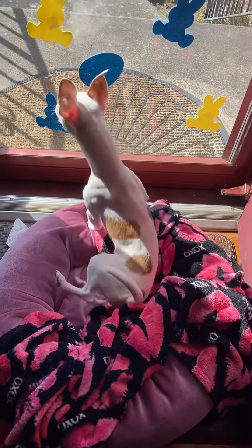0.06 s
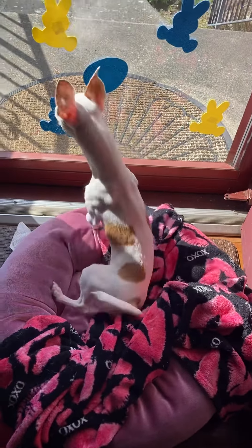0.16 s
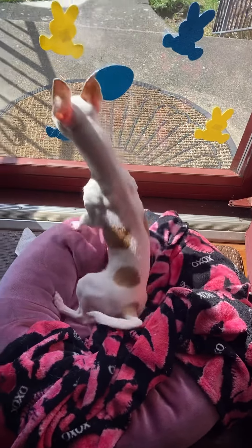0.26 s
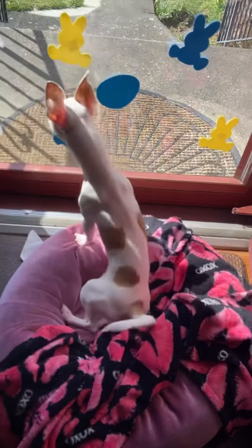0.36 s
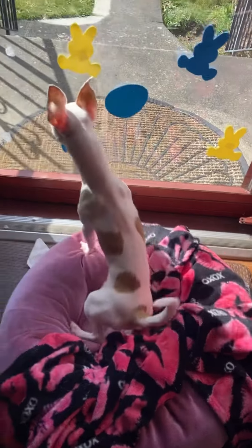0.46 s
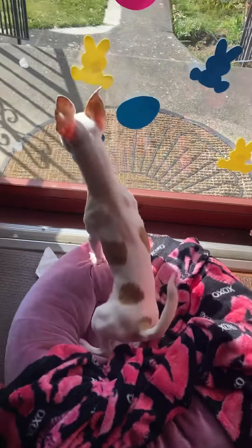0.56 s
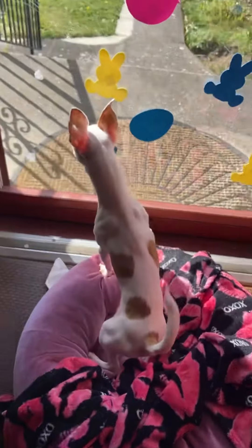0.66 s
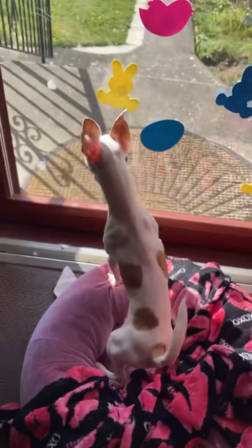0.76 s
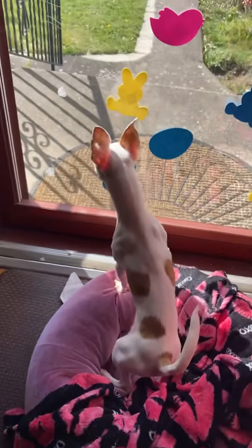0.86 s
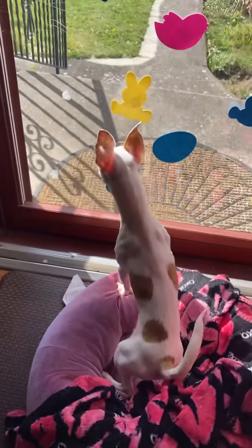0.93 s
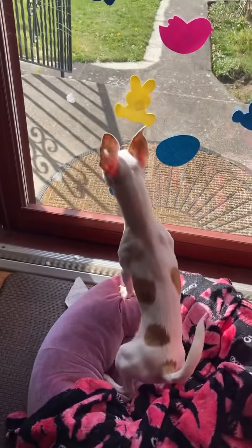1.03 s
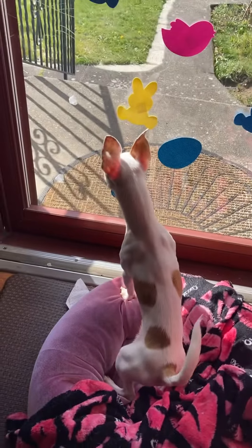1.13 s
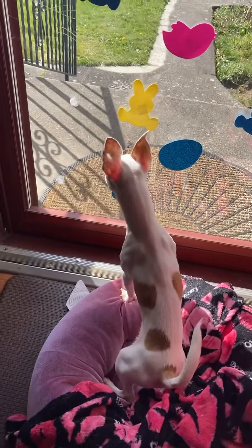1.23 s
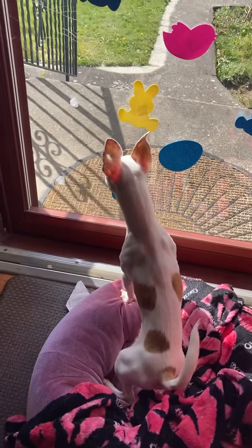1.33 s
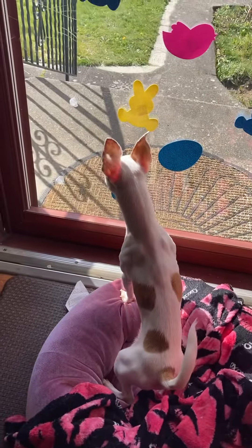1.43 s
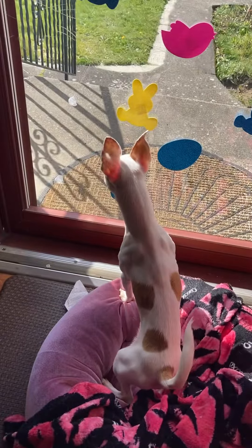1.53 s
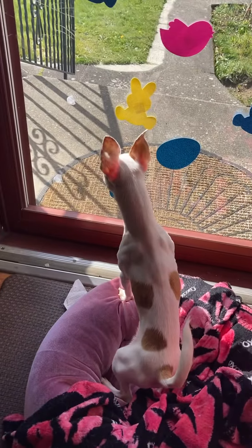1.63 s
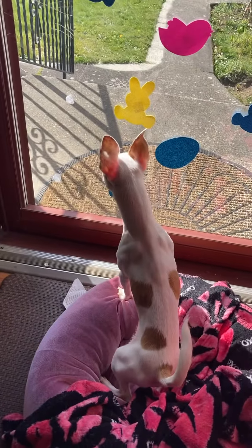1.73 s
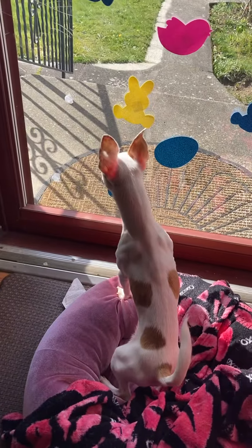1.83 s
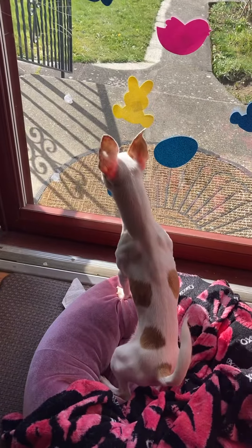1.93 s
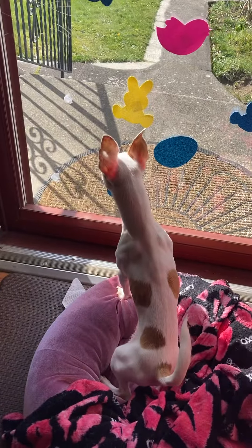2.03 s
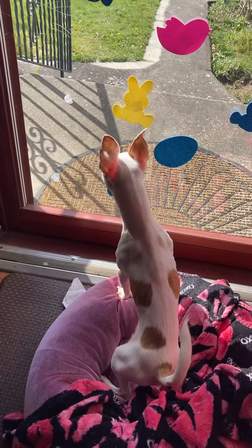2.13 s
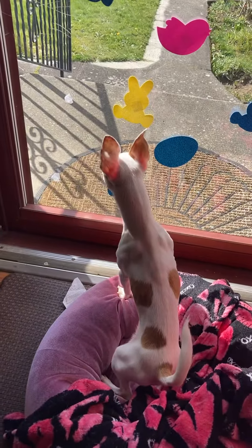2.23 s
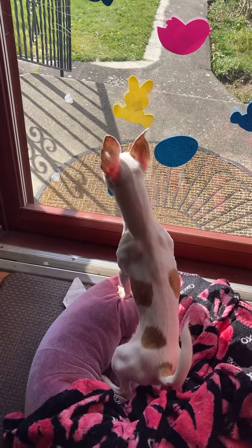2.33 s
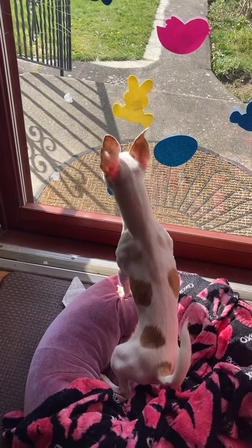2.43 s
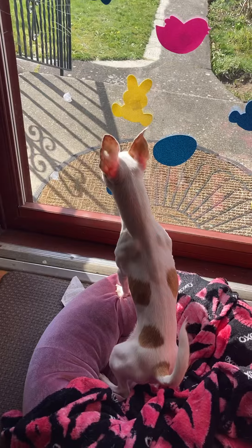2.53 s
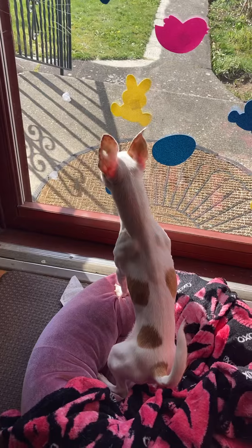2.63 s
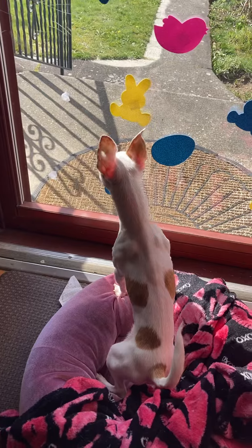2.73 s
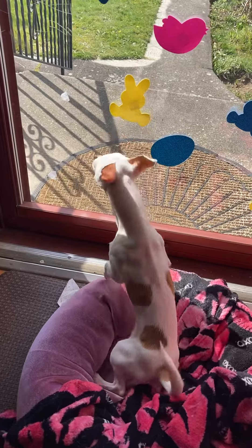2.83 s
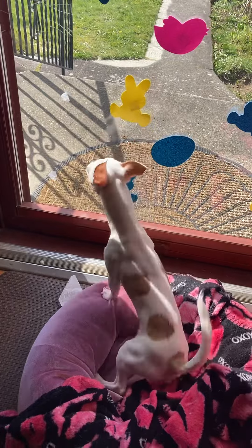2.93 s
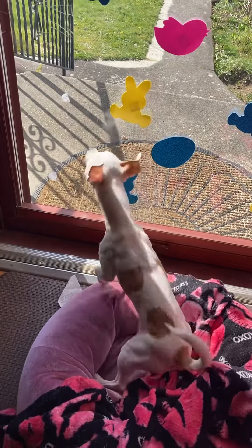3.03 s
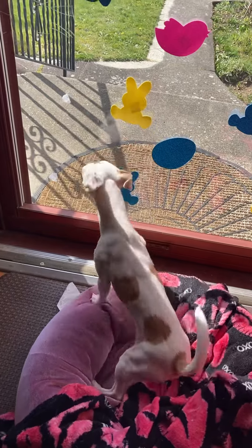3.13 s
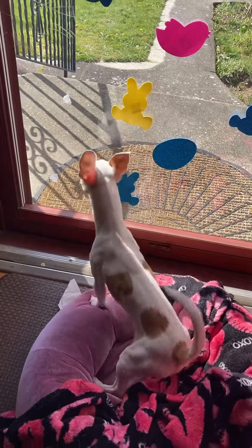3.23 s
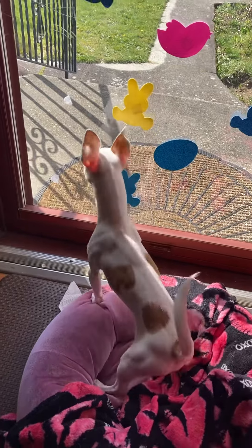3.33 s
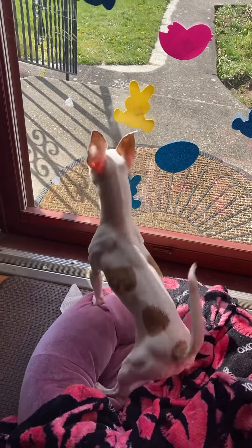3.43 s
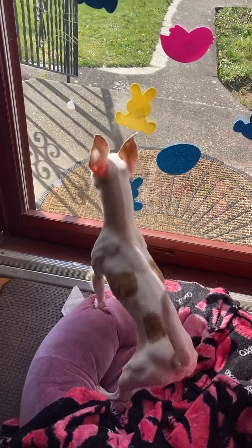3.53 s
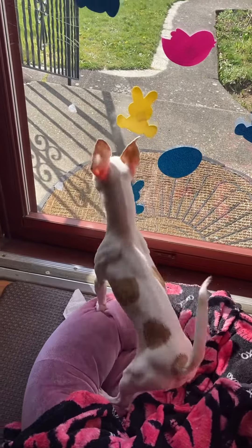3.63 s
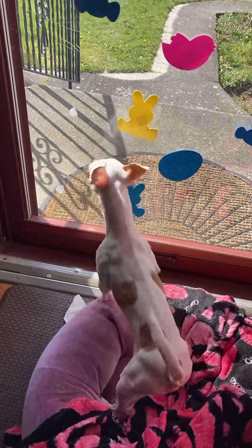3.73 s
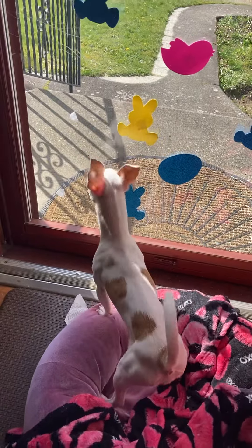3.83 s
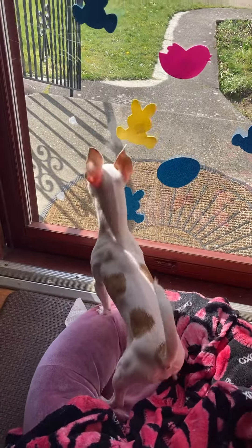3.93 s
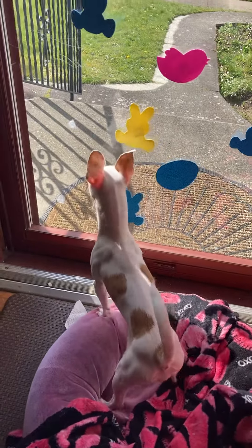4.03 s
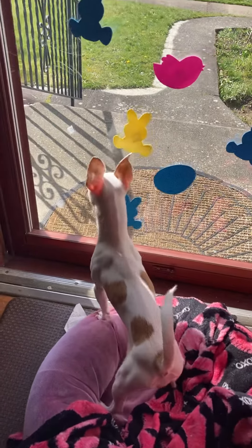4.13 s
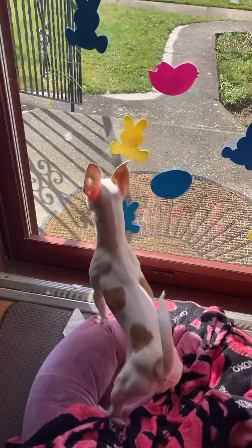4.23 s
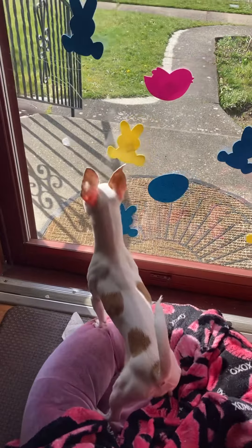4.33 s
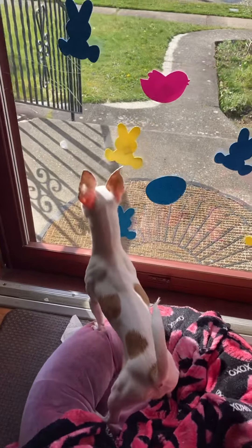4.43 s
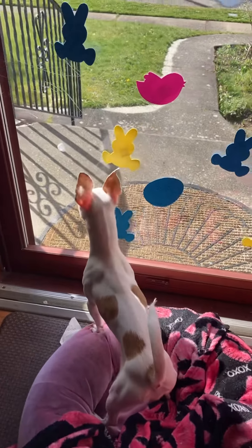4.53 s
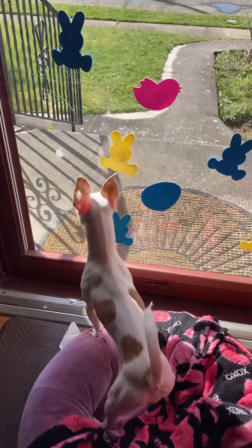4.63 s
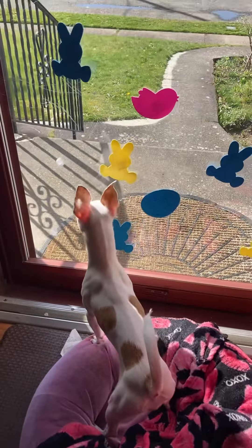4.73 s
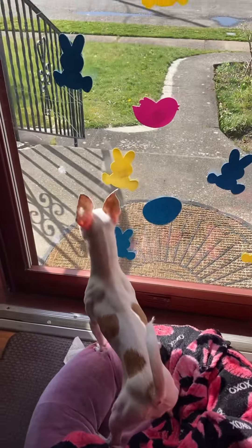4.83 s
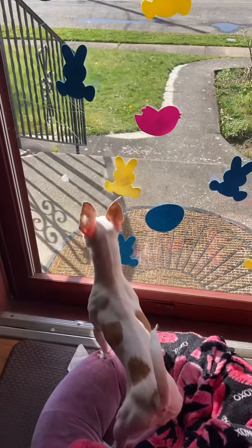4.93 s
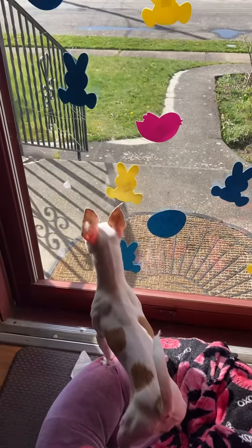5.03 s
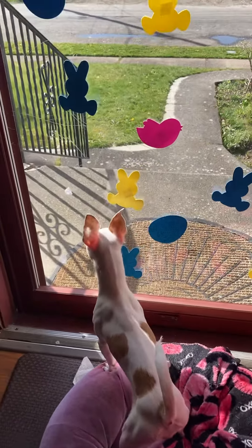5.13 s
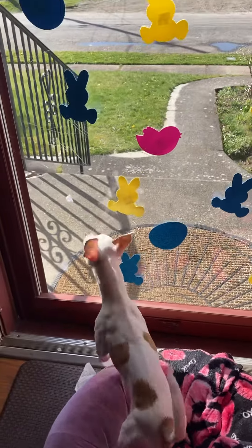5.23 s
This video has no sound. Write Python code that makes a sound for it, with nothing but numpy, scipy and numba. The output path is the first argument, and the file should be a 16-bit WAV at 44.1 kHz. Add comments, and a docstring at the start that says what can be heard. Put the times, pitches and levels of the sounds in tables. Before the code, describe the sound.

Indoors, close up: a fading throaty growl from a small dog, quiet hum, a quick double bark, another bark, and a last upward-breaking yap.

```python
"""A quiet room with a glass door: a small dog growls, sniffs, gives a double bark and two single barks.
The voice is rough vocal folds through jaw, tongue and chest resonances; breaths and lips are shaped noise.
A fridge-like hum throbs over rumble and air noise; all three sink just after every bark begins.
A phone hears it close by: its two ports, mixed to mid and side, cut notches into the treble."""
import sys
import numpy as np
from scipy import signal
from scipy.fft import rfft, irfft, next_fast_len
from scipy.io import wavfile
from scipy.ndimage import uniform_filter1d, minimum_filter1d, map_coordinates
from numba import njit

SR = 44100
rng = np.random.default_rng(int(sys.argv[2]) if len(sys.argv) > 2 else 0)


def to_wav(sig):
    """Store sig (one row per channel, or 1-D mono) as 16-bit WAV at the path in sys.argv[1].

    Samples outside -1..1 are clipped; the rate is SR.
    """
    pcm = np.clip(np.atleast_2d(sig), -1, 1) * 32767
    pcm = np.round(pcm).astype(np.int16)
    wavfile.write(sys.argv[1], SR, pcm.T)  # frames by channels


N = 233067

# barks: start_s, tongue_hz (jaw half open), chest_db (before the opening swell),
# upper_db and rasp_db (before they brighten with the jaw), roughness (0-1)
BARKS = [(2.72, 1883, -14.5, -8, -23.5, 0.83), (2.96, 1841, -21.5, -18.5, -31.5, .48),
         (3.612, 1810, -18.5, -18, -29.5, .65), (5.146, 1452, -23, -24.5, -31, 0.53)]
# how each bark is pushed out, one list a bark: time_s, level_db, jaw_opening (0-1)
BARK_EFFORT = [
    [(2.72, -58, 0.01), (2.735, -27.5, 0.16), (2.747, -23, 0.11), (2.753, -4.5, 0.05), (2.815, -19, 0.94),
     (2.85, -24.5, 0.5), (2.89, -38, .3)],
    [(2.96, -37.5, .2), (2.975, -21, .3), (3.005, -13.5, .6), (3.035, -12.5, 1), (3.055, -15, .9),
     (3.079, -11.5, .35), (3.095, -34, .05)],
    [(3.612, -53, 0.01), (3.65, -18, 0.17), (3.664, -16, .35), (3.672, -11, 0.47), (3.72, -13.5, 0.91),
     (3.748, -16, .6), (3.775, -43.5, 0.53)],
    [(5.146, -48, .65), (5.152, -43.5, .65), (5.177, -26.5, 0.49), (5.188, -10, .6), (5.24, -12.5, .85),
     (5.246, -22.5, .8), (5.28, -20, .8)],
]
# moments where the bark's level dips briefly, in its lowest mouth resonance: time_s, depth_db
LEVEL_DIPS = [(2.772, 12), (2.822, 12), (3.038, 20), (3.067, 16), (3.664, 10), (3.697, 12), (3.722, 10),
              (5.203, 18), (5.213, 18)]
# upper resonances of the open mouth: centre_hz, width_hz, level_db
MOUTH_MODES = [(1222, 220, -1), (1900, 400, -4.5), (2660, 130, -3.5), (3300, 560, -21), (4440, 660, -13)]
# chest resonance, sounds as the mouth opens: centre_hz, width_hz, level_db
CHEST_MODES = [(250, 210, 0)]
# airy hiss of the voice: centre_hz, width_hz, level_db
RASP_MODES = [(6490, 2400, -13.5), (8725, 500, 6.5), (9400, 970, -1.5), (14220, 2000, 2)]
# growls through closed jaws: start_s, end_s, first_pitch_hz, settled_pitch_hz, first_level_db,
# fade_db_per_s, throat_db, first_flutter_depth (0-1), first_rasp_db
GROWLS = [(0, .85, 244.4, 190, -30.5, 16.5, 2, 0.1, -24), (3.86, 4.1, 275, 261.9, -50.5, 29, -10, .15, -32)]
# flapping of the throat: time_s, flaps_per_s
THROAT_FLUTTER = [(0, 28.3), (.3, 27.9), (.45, 24.3), (.85, 23)]
# resonances behind closed jaws: centre_hz, width_hz, level_db
JAW_MODES = [(394.6, 93, -6), (528.3, 43, 4), (746, 116, -7), (956, 180, -9), (1163.6, 120, -15.5),
             (1518, 35, -13)]
# low resonances of the throat: centre_hz, width_hz, level_db
THROAT_MODES = [(226.4, 96, 0), (158.7, 50, -5)]
# breaths: start_s, rise_s, hold_s, level_db, fall_db_per_s, whistle_db (against the breath)
SNIFFS = [(1.324, 0.0087, 0.038, -75, 250, 14), (1.42, 0.039, 0.1, -70.5, 116, -7),
          (3.143, 0.046, 0.11, -47, 140, -32)]
# spectrum of nose air: frequency_hz, relative_density_db
NOSE_SPECTRUM = [(300, -30), (900, 13.5), (2000, -2), (3400, -9.5), (4800, -14.5), (7500, -17),
                 (9500, -24.5), (15000, -30)]
# nose whistle tones, each with its octave: frequency_hz, relative_level_db
WHISTLE_TONES = [(1950, 0), (2400, -10)]
# lips parting: start_s, level_db (rms starts 4.5 dB lower), top_hz, t60_s
LIP_SMACKS = [(3.593, -37, 1127, 0.038), (4.309, -50.5, 11320, 0.034)]
# decay of the room tail: frequency_hz, t60_s
ROOM_DECAY = [(200, 0.95), (1000, 0.44), (3000, 0.62), (9000, 0.14)]
# echo off the door, heard by the side: frequency_hz, level_db
GLASS_ECHO = [(200, -30), (600, -19), (1500, -10), (2100, -13), (3200, -4), (4500, -18.5)]
# dog's sound pushed to the right: frequency_hz, share
RIGHT_LEAN = [(150, .05), (400, .25), (700, .75), (1100, .45), (1400, .2), (1750, .05), (2100, .3),
              (4000, 0)]
# pitch of the hum: time_s, pitch_hz
HUM_PITCH = [(0, 74), (2.7, 73.9), (3.4, 68.64), (5.28, 69.22)]
# spectrum of the rumble: frequency_hz, relative_density_db
RUMBLE_SPECTRUM = [(21, -42.5), (35, -15), (75, 2), (108, -12.5), (145, -19), (237, -20.5), (500, -35),
                   (650, -65.5), (1100, -120)]
# spectrum of the air noise: frequency_hz, relative_density_db
AIR_SPECTRUM = [(180, -37), (300, -25.5), (614, -2), (900, -9), (1010, -8), (5200, -21), (6760, -56.5),
                (11400, -120)]
# how the background sinks, rows hum, rumble, air: recovering_dip_db, lasting_loss_db (a bark)
BACKGROUND_SINK = [(24, 2.5), (7, 4.5), (13.5, 4.5)]
# tone of the summed ports: frequency_hz, gain_db
MID_TONE = [(4000, 1), (5000, 2), (5600, -25), (6200, 0), (8000, -3), (10600, -2.5), (11300, -41),
            (12400, -50), (13200, -17.5), (15000, -18.5)]
# tone of the surroundings at the side: frequency_hz, gain_db
SIDE_TONE = [(60, -26.5), (200, -22), (350, -6.5), (600, 6), (1500, 0.5), (3000, 2.5), (5500, 2),
             (7000, -0.5), (8500, -28.5), (10500, -10.5), (13000, -15), (15000, -40)]
# port spacing, mid fed to the side a quarter turn ahead: frequency_hz, share (signed)
PORT_SPACING = [(1000, 0.091), (3000, -0.53), (4500, 0.77), (5500, 0.564), (5700, -0.68), (7000, -.8),
                (8000, 0.16), (9200, 0), (10200, .5), (12000, .3), (13500, 0.33)]

# bark voice
SHUT_HZ, OPEN_HZ = 270, 368  # pitch with the jaw shut and wide open, before the break
MOUTH_SHUT_HZ, MOUTH_OPEN_HZ = 810, 1120  # lowest mouth resonance
BRIGHTEN_DB, RASP_GAIN_DB, BRIGHT_LAG_S = 12, 1.5, 0.0052  # upper resonances and rasp grow with the jaw
BREAK_S, BREAK_PITCH_RATIO, BREAK_UPPER_DB = 5.243, 1.45, 8  # the last bark breaks upward
DIP_S = .0045
MOUTH_TOP_HZ, OVER_TOP_DB = 3150, -15.5  # the voice drops steeply above the mouth's range
TONGUE_DB, TONGUE_BREAK_DB = 1, 4  # tongue among the upper resonances; extra after the break
TONGUE_LIFT = .12  # share by which the tongue resonance rises as the jaw opens
# growls
FIRST_FLAP_S, SETTLE_S = .035, .35
GROWL_RISE_S, GROWL_STOP_DB_S = 0.05, 502
DEEPEN_PER_S, CLEAR_PER_S, GROWL_ROUGH, RASP_FADE_DB_S = 1.09, .4, .85, 10.5
# breath, echo
SNIFF_RISE_DB = 20
EARLIER_DB, EARLIER_T60_S = -43.5, 0.58  # echo of an earlier bark, level at 0 s
GLASS_LAG_S = .0017
# background
HUM_DB, HUM_FADE_DB_S, RUMBLE_DB, AIR_DB = -41.5, 3, -55.5, -73
THROB_S, FIRST_DIP_S, THROB_DEPTH = .305, .365, .8
SINK_AFTER_S, RECOVER_S = 0.043, .3  # lag after a bark starts, then time constant of recovery
DRONE_HZ, DRONE_WIDTH_HZ, DRONE_DB = 240, 25, 6.7  # faint drone in the rumble
# phone
TOP_HZ, LIMIT = 15850, .93


def amp(db):
    """Decibels to amplitude."""
    return 10 ** (np.asarray(db) / 20)


def unit(x):
    """x at an rms of 1."""
    return x / np.sqrt(np.mean(x ** 2) + 1e-20)


def along(points, hz):
    """(Hz, value) points read on a log frequency axis."""
    f, v = np.transpose(points)
    return np.interp(np.log(hz + 1), np.log(f + 1), v)


def curves(calls):
    """One value per sample for each column, and a gate that is open during the calls."""
    t = np.arange(N) / SR
    s, *cols = np.transpose(np.vstack(calls))
    gate = sum((t >= c[0][0]) & (t <= c[-1][0] + .005) for c in calls)
    smooth_gate = uniform_filter1d(np.minimum(gate, 1.), size=200)
    return [np.interp(t, s, c) for c in cols] + [smooth_gate]


def wobble(rate):
    """A smooth random curve, rate knots a second."""
    knots = rng.standard_normal(int(N * rate / SR) + 4)
    return map_coordinates(knots, [np.arange(N) * rate / SR])


def filtered(x, response):
    """x times a complex response of frequency."""
    m = next_fast_len(N + SR)
    return irfft(rfft(x, m) * response(np.fft.rfftfreq(m, 1 / SR)), m)[..., :N]


def above(f, edge_hz):
    """Gain that passes what lies above an edge."""
    return (f / edge_hz) ** 4 / (1 + (f / edge_hz) ** 4)


def below(f, edge_hz, order):
    """Gain that passes what lies below an edge."""
    return 1 / (1 + (f / edge_hz) ** order)


def modes(table):
    """Causal response of resonances (Hz, width Hz, dB), alternating in sign."""
    def response(f):
        total = 0
        for k, (c, w, db) in enumerate(table):
            total = total + (-1) ** k * amp(db) * 1j * f * w / (c * c - f * f + 1j * f * w)
        return total
    return response


def noise(response):
    """White noise coloured by a response, at an rms of 1."""
    return unit(filtered(rng.standard_normal(N), response))


def steady(x, span):
    """x with its running rms over span seconds brought to 1."""
    return x / np.sqrt(np.abs(uniform_filter1d(x * x, size=int(span * SR))) + 1e-12)


@njit
def ring(x, hz, pole):
    """A resonance whose centre moves; hz is given in radians a sample."""
    y = np.zeros(len(x))
    for i in range(2, len(x)):
        y[i] = x[i] - x[i - 2] + 2 * pole * np.cos(hz[i]) * y[i - 1] - pole * pole * y[i - 2]
    return y


def resonate(x, hz, width_hz):
    """x through a moving resonance of a given width."""
    return ring(x, 2 * np.pi * hz / SR, np.exp(-np.pi * width_hz / SR))


def folds(hz, rough, jitter, scatter_db):
    """Vocal folds: overtones that wander in phase and size, mixed with air noise that swells once a cycle."""
    rough = np.clip(rough, 0, 1)
    phase = 2 * np.pi * np.cumsum(hz * (1 + jitter * rough * wobble(90))) / SR
    voiced = np.zeros(N)
    for k in range(1, 14):
        drift = wobble(70)
        wander = (1 + .4 * k) * rough + .012 * k * k
        size = amp(scatter_db * rough * drift)
        voiced += size * np.cos(k * phase + wander * np.roll(drift, SR // 3))
    cycle = (1 + np.cos(phase)) / 2
    air = filtered((.5 + cycle) * rng.standard_normal(N), lambda f: f < 5200)
    return np.sqrt(1 - rough ** 2) * unit(voiced) + rough * unit(air), cycle


def barks():
    """A rough voice through moving mouth and tongue resonances, fixed upper ones, a chest and a treble rasp."""
    db, jaw, gate = curves(BARK_EFFORT)
    t = np.arange(N) / SR
    bark = np.maximum(np.searchsorted(np.transpose(BARKS)[0], t + .01) - 1, 0)
    _, tongue_hz, chest_db, upper_db, rasp_db, rough = np.array(BARKS)[bark].T
    broken = np.clip((t - BREAK_S) / .008 + .5, 0, 1)
    hz = (SHUT_HZ + (OPEN_HZ - SHUT_HZ) * jaw) * BREAK_PITCH_RATIO ** broken
    mouth_hz = MOUTH_SHUT_HZ + (MOUTH_OPEN_HZ - MOUTH_SHUT_HZ) * jaw
    tongue_hz = tongue_hz * (1 + TONGUE_LIFT * (jaw - .5))
    late_jaw = np.interp(t - BRIGHT_LAG_S, t, jaw) ** 2
    upper_db = upper_db + BRIGHTEN_DB * late_jaw + BREAK_UPPER_DB * broken
    rasp_db = rasp_db + RASP_GAIN_DB * late_jaw
    source, cycle = folds(hz, rough, jitter=.06, scatter_db=6)

    mouth, tongue = source, source
    for _ in range(2):  # twice, for dark valleys around the resonances
        mouth = resonate(mouth, mouth_hz, 220)
        tongue = resonate(tongue, tongue_hz, 420)
    wide = resonate(source, 0.77 * mouth_hz, 260)
    under = filtered(wide, lambda f: above(f, 320) * (1 - above(f, 810)))
    # 1 where the level climbs fast, .08 where it is level or falls
    opening = np.clip(uniform_filter1d(np.gradient(db) * SR, size=900) / 300, .08, 1)
    dip_db = sum(-depth * np.exp(-((t - s) / DIP_S) ** 2) for s, depth in LEVEL_DIPS)
    low = amp(dip_db) * steady(mouth, .03) + (.07 + .3 * opening) * steady(under, .08)

    upper = steady(filtered(source, lambda f: modes(MOUTH_MODES)(f) * above(f, 1150)), .05)
    upper = .65 * upper + amp(TONGUE_DB + TONGUE_BREAK_DB * broken) * steady(tongue, .05)
    top = lambda f: np.maximum(below(f, MOUTH_TOP_HZ, 12), amp(OVER_TOP_DB))
    low, upper = filtered(low, top), filtered(upper, top)
    chest = steady(filtered(source, lambda f: modes(CHEST_MODES)(f) ** 2), 0.09)
    chest = opening * amp(chest_db) * chest
    rasp = (1.2 + cycle) * noise(lambda f: modes(RASP_MODES)(f) * above(f, 3900))
    return gate * amp(db) * (low + chest + amp(upper_db) * upper + amp(rasp_db) * rasp)


def growls():
    """A low voice behind closed jaws, chopped by a flapping throat; it sags, fades and flutters ever deeper."""
    t = np.arange(N) / SR
    which = np.searchsorted(np.transpose(GROWLS)[0], t, "right") - 1
    start, end, hz, settled_hz, db, fade, throat_db, depth, rasp_db = np.array(GROWLS)[which].T
    age = np.minimum(t, end) - start
    hz = settled_hz + (hz - settled_hz) * np.exp(-age / SETTLE_S)
    depth = depth + DEEPEN_PER_S * age
    rough = GROWL_ROUGH - CLEAR_PER_S * age
    db = db - fade * age - GROWL_STOP_DB_S * np.maximum(t - end, 0)
    rasp_db = rasp_db - RASP_FADE_DB_S * age
    rise = 1 - .5 * np.exp(-age / GROWL_RISE_S)
    source, cycle = folds(hz, rough, jitter=.06, scatter_db=4)

    flaps = np.cumsum(np.interp(t, *np.transpose(THROAT_FLUTTER))) / SR
    turn = 2 * np.pi * (flaps - flaps[round(FIRST_FLAP_S * SR)])
    flap = (1 + np.cos(turn + .5 * np.cos(turn))) / 2  # opens faster than it shuts
    puff = 1 - np.clip(depth, 0, 1) * (1 - flap ** 1.3)
    jaws = steady(filtered(source, lambda f: modes(JAW_MODES)(f) * below(f, 1700, 6)), 0.1)
    boom = steady(filtered(source, lambda f: modes(THROAT_MODES)(f) * below(f, 330, 6)), 0.031)
    # mostly the clean lowest tone, nearly shut off between flaps
    throat = (.1 + flap ** 1.5) * (2 * cycle - 1 + .7 * boom)
    rasp = noise(lambda f: modes(RASP_MODES)(f) * (f > 7500) * (f < 11000))
    hiss = amp(-21) * noise(lambda f: (f > 13800) & (f < TOP_HZ))
    chopped = puff * (jaws + amp(rasp_db) * rasp + hiss)
    return rise * amp(db) * (chopped + amp(throat_db) * throat)


def nose_whistle():
    """Thin tones that waver in pitch and level, each with its octave."""
    whistle = np.zeros(N)
    for hz, level_db in WHISTLE_TONES:
        phase = 2 * np.pi * np.cumsum(hz * (1 + .035 * wobble(120))) / SR
        whistle += amp(level_db + 3.5 * wobble(90)) * (np.sin(phase) + 0.4 * np.sin(2 * phase))
    return whistle


def lip_smacks():
    """Lips part: short bursts of band-limited noise that die away."""
    out = np.zeros(N)
    t = np.arange(SR // 10) / SR
    for s, db, top_hz, t60 in LIP_SMACKS:
        band = signal.butter(4, [300, top_hz], "band", fs=SR, output="sos")
        puff = signal.sosfilt(band, rng.standard_normal(len(t)))
        out[round(s * SR):][:len(t)] += amp(db - 4.5 - 60 * t / t60) * unit(puff)
    return out


def sniffs():
    """Air rushing through the nose as shaped noise, mixed with the whistle by breath."""
    t = np.arange(N) / SR
    whistle = nose_whistle()
    air = noise(lambda f: amp(along(NOSE_SPECTRUM, f)))
    out = np.zeros(N)
    for s, rise, hold, db, fall, whistle_db in SNIFFS:
        rise_db = -SNIFF_RISE_DB * np.clip(1 - (t - s) / rise, 0, 1)
        fall_db = -fall * np.maximum(t - s - rise - hold, 0)
        out += (t > s) * amp(db + rise_db + fall_db) * (air + amp(whistle_db) * whistle)
    return amp(1.2 * wobble(60)) * out


def earlier_bark():
    """The dying echo of a bark just before: mouth-coloured noise, separate for front and side."""
    fade = amp(EARLIER_DB - 60 * np.arange(N) / SR / EARLIER_T60_S)
    mouth = modes([(935, 100, 0)] + MOUTH_MODES)
    return fade * np.array([noise(lambda f: mouth(f) * below(f, MOUTH_TOP_HZ, 12)) for _ in range(2)])


def room(x, lag):
    """Two diffuse answers of the room: near walls that die fast, then a tail, each frequency at its own speed."""
    hz, t, z = signal.stft(rng.standard_normal((2, SR)), SR, nperseg=256)
    near_walls = amp(-60 * t / 0.057)
    late = amp(-10.5 - 60 * t / along(ROOM_DECAY, hz)[:, None])
    tail = signal.istft(z * (near_walls + late), SR, nperseg=256)[1]
    delayed = np.pad(x, (round(lag * SR), 0))
    return signal.fftconvolve(delayed[None], tail / np.linalg.norm(tail[0]), axes=1)[:, :N]


def hum(sink_db):
    """A fridge-like sine that drifts in pitch and throbs with regular dips."""
    t = np.arange(N) / SR
    hz, _ = curves([HUM_PITCH])
    depth = np.clip(THROB_DEPTH + .25 * wobble(3), 0, 1)
    throb = 1 - depth * np.cos(np.pi * (t - FIRST_DIP_S) / THROB_S) ** 4
    fade_db = HUM_FADE_DB_S * np.minimum(t, BARKS[0][0])  # fades until the first bark
    level = amp(HUM_DB + sink_db - fade_db + 1.5 * wobble(24))
    return np.sqrt(2) * throb * level * np.sin(2 * np.pi * np.cumsum(hz + 2.5 * wobble(10)) / SR)


def rumble(sink_db):
    """Low noise with a faint drone and a gap where the hum sits."""
    def spectrum(f):
        drone_db = DRONE_DB * np.exp(-((f - DRONE_HZ) / DRONE_WIDTH_HZ) ** 2)
        hum_gap = 1 - np.exp(-((f - 73) / 14) ** 2)
        return amp(along(RUMBLE_SPECTRUM, f) + drone_db) * hum_gap
    return amp(RUMBLE_DB + sink_db + 1.8 * wobble(2)) * np.array([noise(spectrum), noise(spectrum)])


def air_noise(sink_db):
    """Patchy air: interleaved noise bands that waver separately, under a treble fizz."""
    bands = []
    for k in range(6):
        band = noise(lambda f: amp(along(AIR_SPECTRUM, f)) * ((f / 700 + k) % 3 < 1))
        bands.append(band * amp(2.5 * wobble(14)))
    patchy = unit(np.reshape(bands, (2, 3, N)).sum(axis=1))
    fizz = [noise(lambda f: f > 4500) * amp(-7.0) for _ in range(2)]
    return amp(AIR_DB + sink_db) * (patchy + fizz)


def background():
    """Hum, rumble and air for front and side; all sink after each bark starts and come only partly back."""
    t = np.arange(N) / SR
    since = t - SINK_AFTER_S - np.transpose(BARKS)[0][:, None]
    recovery = (since > 0) * np.exp(-np.abs(since) / RECOVER_S)
    dip = uniform_filter1d(recovery.max(axis=0), size=2000)
    lost = uniform_filter1d((since > 0).sum(axis=0) * 1., size=2000)
    hum_db, rumble_db, air_db = [-dip_db * dip - loss_db * lost for dip_db, loss_db in BACKGROUND_SINK]
    return hum(hum_db) * amp([[0], [-3]]) + rumble(rumble_db) + air_noise(air_db)


def scene():
    """Left and right channels, built from mid and side: the dog direct, off the door glass and in the room."""
    dog = barks() + growls() + sniffs() + lip_smacks()
    around = amp(-7) * room(dog, lag=.006) + earlier_bark() + background()
    mid = dog + around[0]
    echo = lambda f: amp(along(GLASS_ECHO, f)) * np.exp(-2j * np.pi * f * GLASS_LAG_S)
    glass = filtered(dog, lambda f: echo(f) - along(RIGHT_LEAN, f))
    # the spaced ports hear each wave a little apart
    ports = filtered(mid, lambda f: 1j * along(PORT_SPACING, f))
    side = glass + ports + filtered(around[1], lambda f: amp(along(SIDE_TONE, f)))
    return np.array([mid + side, mid - side])


def record(dry):
    """The summed ports cancel in two treble bands; a limiter; a band limit; then faint hiss."""
    mid = filtered(dry.mean(axis=0), lambda f: amp(along(MID_TONE, f)))
    side = (dry[0] - dry[1]) / 2
    out = np.array([mid + side, mid - side])
    need = np.minimum(1, LIMIT / (np.abs(out).max(axis=0) + 1e-9))
    out = out * uniform_filter1d(minimum_filter1d(need, size=400), size=200)
    return filtered(out, lambda f: f < TOP_HZ) + amp(-101) * rng.standard_normal(out.shape)


dry = scene()
out = record(dry)
to_wav(out)
```